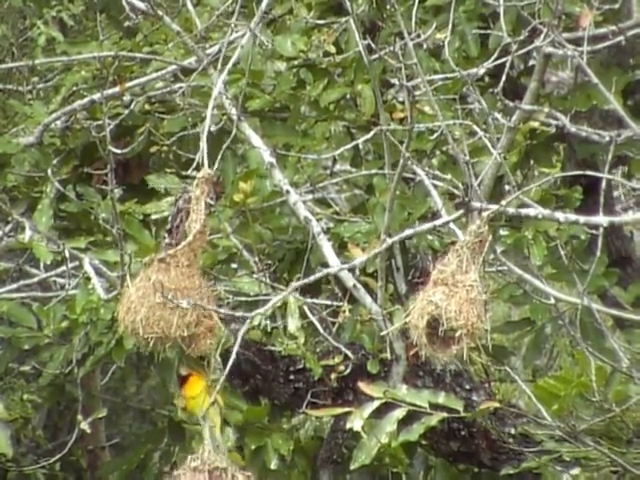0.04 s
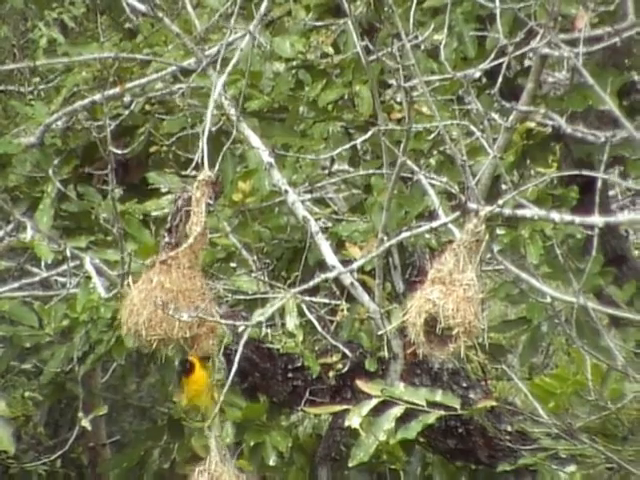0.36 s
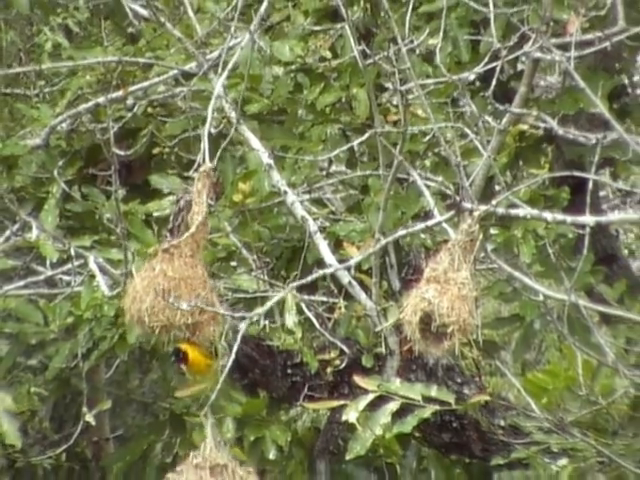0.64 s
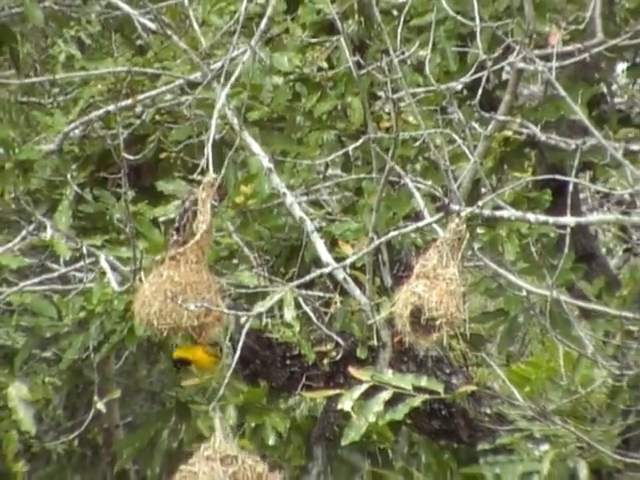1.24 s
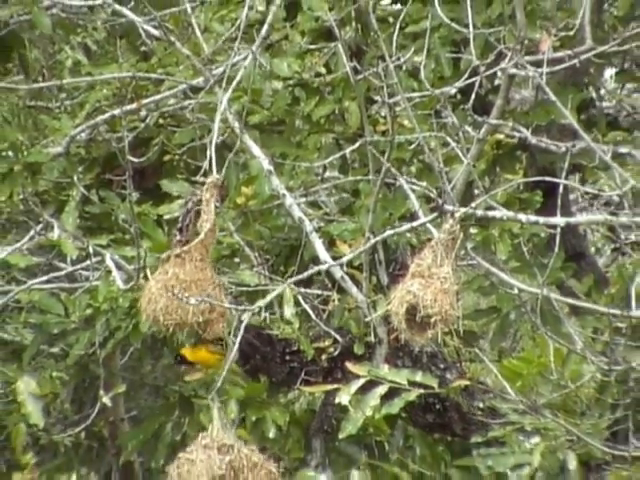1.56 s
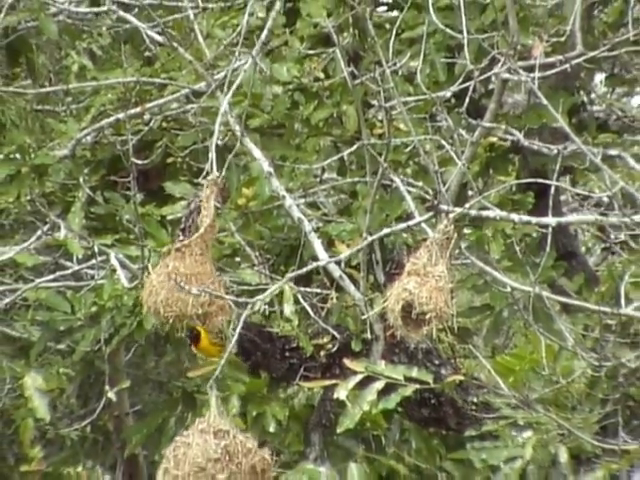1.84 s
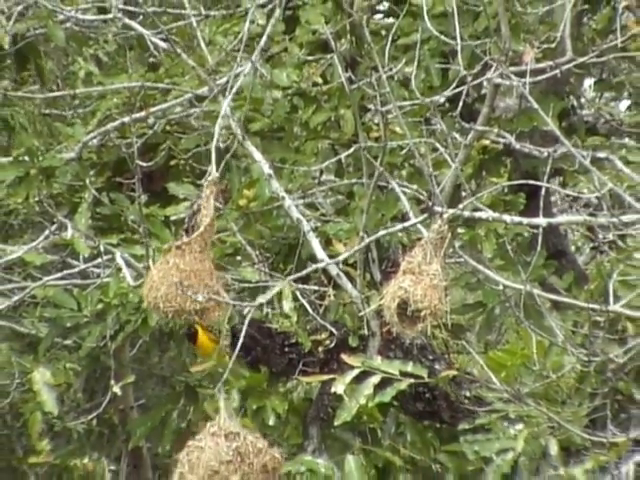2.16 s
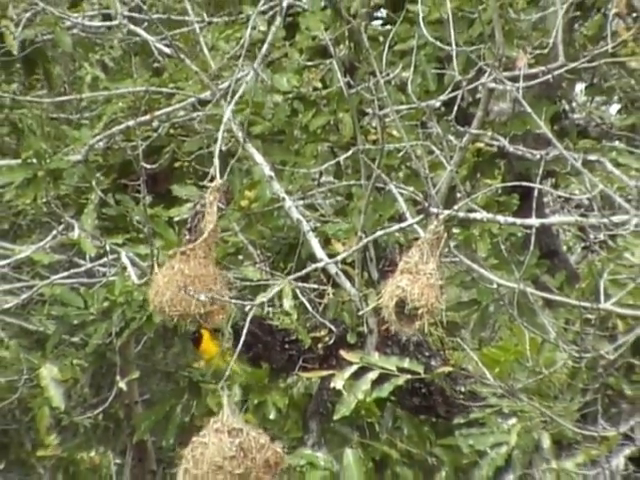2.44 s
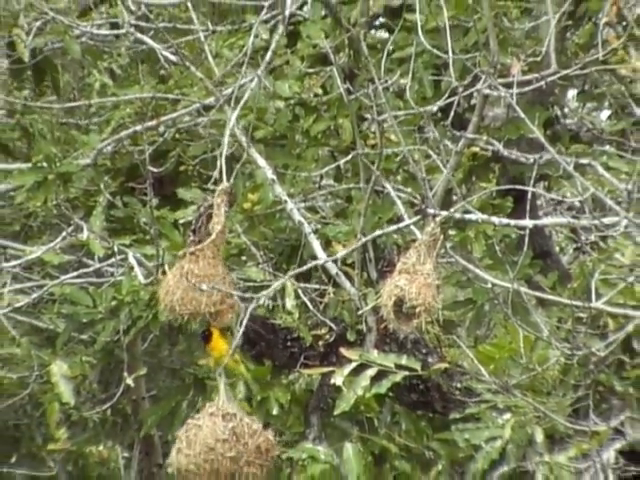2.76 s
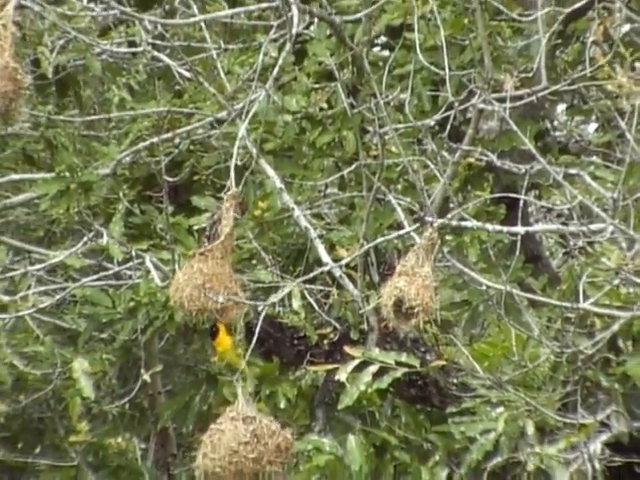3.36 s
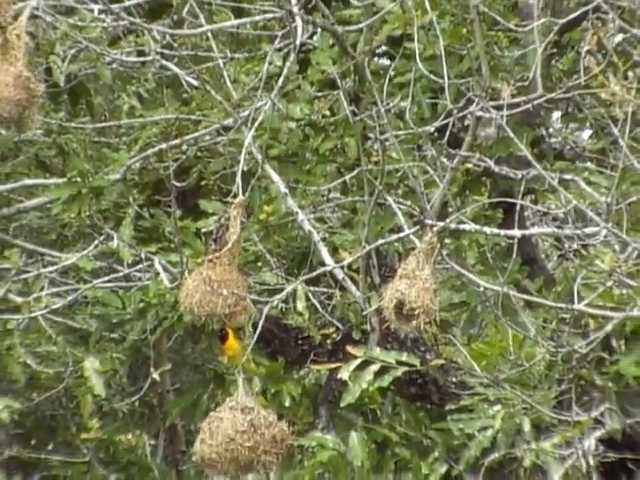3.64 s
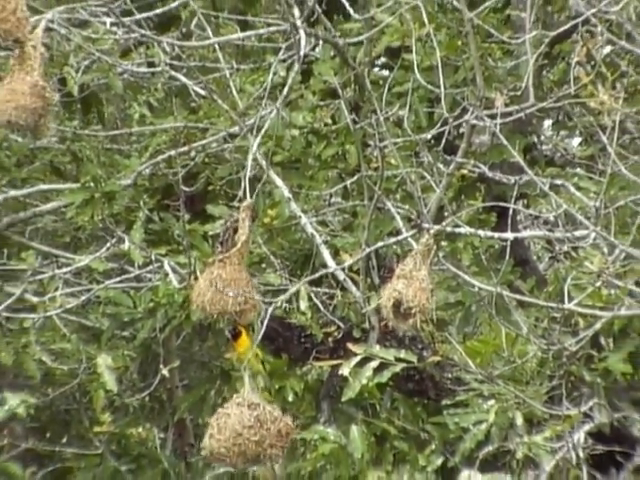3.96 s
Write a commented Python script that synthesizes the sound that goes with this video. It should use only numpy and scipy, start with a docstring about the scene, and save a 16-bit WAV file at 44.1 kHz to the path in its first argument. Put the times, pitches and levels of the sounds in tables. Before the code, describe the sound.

Many small birds chirp and chatter in a tree, close to the microphone. One repeats an arched note while others add rising whistles, sharp chips and rasps. Distant birds babble over a steady hiss.

```python
"""Weaver colony in a tree

Close to a stereo pair of microphones, one bird repeats a rising whistle and another an arched note
every 0.6 s. Neighbours add slurs, chips, nasal calls, rasps, buzzes and croaks, scattered by the branches.
Each whistle is an unsteady tone of the syrinx. Farther off, the colony blends into a babble over a
steady hiss, with a few soft low bumps."""
import sys
import numpy as np
from scipy import signal
from scipy.fft import rfft, irfft
from scipy.io import wavfile

SR = 44100
rng = np.random.default_rng(int(sys.argv[2]) if len(sys.argv) > 2 else 0)


def to_wav(sig):
    """Store sig (one row per channel, or 1-D mono) as 16-bit WAV at the path in sys.argv[1].

    Samples outside -1..1 are clipped; the rate is SR.
    """
    pcm = np.clip(np.atleast_2d(sig), -1, 1) * 32767
    pcm = np.round(pcm).astype(np.int16)
    wavfile.write(sys.argv[1], SR, pcm.T)  # frames by channels


N = 176400
TIME_S = np.arange(N) / SR
LEFT_RIGHT = np.array([[1], [-1]])
TREE_T60_S = 0.28


def from_db(db):
    """Decibels to gain."""
    return 10 ** (np.asarray(db) / 20)


def rms_one(x):
    """Scale to unit rms."""
    return x / np.sqrt(np.mean(x ** 2) + 1e-20)


def at_hz(points, hz):
    """Read a spectrum on a log-frequency axis."""
    freqs, values = np.transpose(points)
    return np.interp(np.log(hz), np.log(freqs), values)


def contour(points, at):
    """Read a curve of straight lines between points."""
    return np.interp(at, *np.transpose(points))


def bandpass(x, low_hz, high_hz):
    """Keep one band, with gentle slopes."""
    return signal.sosfilt(signal.butter(2, [low_hz, high_hz], "band", fs=SR, output="sos"), x)


def drift(rate_hz, size):
    """Smooth random wander of spread about 1."""
    at = np.arange(size) * rate_hz / SR
    knots = np.random.default_rng(rng.integers(1 << 30)).standard_normal(int(at[-1]) + 2)
    return np.interp(at, np.arange(len(knots)), knots)


def progress(length_s):
    """Runs from 0 to 1 over a note; called u below."""
    return np.linspace(0, 1, max(int(length_s * SR), 64))


def envelope(u, edge):
    """Soft rise, hold, soft fall; each edge takes the given share of the note."""
    return np.sin(np.pi / 2 * np.clip(np.minimum(u, 1 - u) / edge, 0, 1))


def pulse_cycle(per_s, jitter, jitter_hz, size):
    """Runs from 0 to 1 over each pulse of an uneven train."""
    return np.cumsum(per_s * (1 + jitter * drift(jitter_hz, size))) / SR % 1


def perch(out, start_s, sound):
    """Mix a sound in at its time, from a perch a little left or right of the microphones."""
    onset = int(start_s * SR)
    first, last = max(onset, 0), min(onset + len(sound), N)
    pan = from_db(-0.25 * rng.normal() * LEFT_RIGHT)
    if last > first:
        out[:, first:last] += pan * sound[first - onset:last - onset]


def whistle(hz, waver=0.007, rough=0):
    """An unsteady tone of the syrinx; fast flutter of its strength makes it hoarse."""
    phase = 2 * np.pi * np.cumsum(hz * (1 + waver * drift(583, len(hz)))) / SR
    hoarse = (1 + rough * drift(1400, len(hz))) / np.sqrt(1 + rough ** 2)
    shimmer = from_db(1.32 * drift(201, len(hz)))
    return (np.sin(phase) + from_db(-22) * np.sin(2 * phase)) * hoarse * shimmer


def scatter(x, t60_s, side_db=-15):
    """Many small reflections from leaves and branches, dying away."""
    t = np.arange(SR // 2) / SR
    mid, side = rng.standard_normal((2, len(t))) * from_db(-60 * t / t60_s) * (t > .001)
    echoes = (mid + from_db(side_db) * side * LEFT_RIGHT) / np.sqrt(np.sum(mid ** 2))
    return signal.fftconvolve(x, echoes, axes=1)[:, :N]


def off_axis(x, left_lead_s):
    """Sound from one side reaches one microphone slightly earlier."""
    hz = np.arange(N // 2 + 1) * SR / N
    return irfft(rfft(x) * np.exp(1j * np.pi * hz * left_lead_s * LEFT_RIGHT), N)


# How alike the ambience is at the two microphones: frequency_hz, correlation
MIC_LIKENESS = [(40, 0.97), (2800, 1), (4500, 0.75), (6500, 0.034), (8000, 0.023), (11000, 0.019)]

def ambience(spectrum, flicker_db, low_flicker_db):
    """Third-octave stereo noise at unit rms, each band with its own level, flicker and width."""
    out, edges = 0, 30 * 2 ** (np.arange(27) / 3)
    white = rng.standard_normal((2, 2, N))
    for k, (low, high) in enumerate(zip(edges, edges[1:])):
        mid, side = bandpass(white[k % 2], low, high)
        hz = np.sqrt(low * high)
        alike = at_hz(MIC_LIKENESS, hz)
        band = np.sqrt(1 + alike) * mid + np.sqrt(1 - alike) * side * LEFT_RIGHT
        depth_db = at_hz([(180, low_flicker_db), (520, flicker_db)], hz)
        out = out + from_db(at_hz(spectrum, hz) + depth_db * drift(22.23, N)) * band
    return rms_one(out)


# Hiss all around the tree: frequency_hz, relative_density_db
HISS_SPECTRUM = [(30, -69), (60, -31.5), (120, -33.5), (250, -11), (500, 0.5), (800, 3.5), (1100, 2.5),
                 (1800, 8.5), (3000, -10), (5000, 0.5), (6400, 3), (7700, 7), (9500, 7.5), (11000, -3)]
# Faint rumble, the same at both microphones: time_s, level_db
RUMBLE_LEVELS = [(0, -76.5), (1.1, -75.5), (1.2, -104), (1.6, -105), (1.7, -75), (2.4, -69), (3.3, -80),
                 (4, -76)]

def background():
    """Steady hiss with an uneven low rumble and a faint wavering hum."""
    phase = 2 * np.pi * np.cumsum(808 + 6.94 * drift(60, N)) / SR
    hum = from_db(-61 + 2 * drift(4.93, N)) * np.sin(phase + .5 * LEFT_RIGHT)
    low_noise = rms_one(bandpass(rng.standard_normal(N), 62.4, 356))
    rumble = low_noise * from_db(contour(RUMBLE_LEVELS, TIME_S) + 3.3 * drift(24.94, N))
    hiss = from_db(-47) * ambience(HISS_SPECTRUM, flicker_db=.5, low_flicker_db=8.5)
    return hiss + hum + rumble


# Echoes of the distant birds: frequency_hz, relative_density_db
WASH_SPECTRUM = [(200, -60), (500, -24.5), (1200, -22), (1900, -7.5), (2400, -13), (2800, 0.5),
                 (3400, -6.5), (3900, -1.5), (4700, -9), (5600, -33), (7000, -15)]
# Distant chatter as it reaches the microphones: time_s, level_db
BABBLE_LEVELS = [(0, -42.5), (.25, -39.5), (0.549, -43), (.68, -39.5), (.87, -42), (1.1, -38), (1.27, -41),
                 (1.36, -46.5), (1.48, -40), (1.63, -48), (1.8, -38), (1.99, -43.5), (2.1, -39),
                 (2.45, -37.5), (2.93, -36), (3.5, -36.5), (3.72, -41), (3.95, -37)]

def far_colony(calls_per_s=190, low_hz=2727, high_hz=3852):
    """Distant birds slur at random in two registers; their echoes merge into a wash."""
    wash = from_db(-3.5) * ambience(WASH_SPECTRUM, flicker_db=2.3, low_flicker_db=2.3)
    calls = np.zeros((2, N))
    chance = np.random.default_rng(rng.integers(1 << 30))
    for _ in range(int(calls_per_s * N / SR)):
        when, register, span = chance.random(3)
        pitch, glide, strength = np.clip(chance.normal(size=3), -2, 2)
        u = progress(.008 + .035 * span ** 2)
        register_hz = low_hz if register < .55 else high_hz
        hz = register_hz * np.exp(.1 * pitch + 0.1809 * (glide - .5) * (u - .5))
        tone = whistle(hz, waver=0.017, rough=.4)
        perch(calls, when * N / SR, from_db(2 * strength) * envelope(u, 0.12) * tone)
    babble = rms_one(calls + from_db(-3.5) * scatter(calls, TREE_T60_S))
    return from_db(contour(BABBLE_LEVELS, TIME_S)) * rms_one(babble + wash)


# Soft low bumps, near the centre: start_s, length_s, level_db
LOW_BUMPS = [(0.069, 0.035, -58.5), (1.84, 0.039, -50), (2.487, 0.029, -52.5), (3.974, 0.016, -48)]

def bumps():
    """Short, soft puffs of low noise."""
    out = np.zeros((2, N))
    low_noise = rms_one(bandpass(rng.standard_normal(N), 233, 680))
    for start, length, db in LOW_BUMPS:
        u = progress(length)
        puff = np.roll(low_noise, int(start * SR))[:len(u)]
        perch(out, start, from_db(db) * envelope(u, 0.057) * puff)
    return out


# Low croaks under the nearby chatter: start_s, length_s, level_db
CROAK_CALLS = [(2.507, 0.16, -52), (2.715, 0.11, -56.5), (3.056, 0.23, -51.5)]

def croaks():
    """Hoarse calls: noise, chopped in uneven pulses, in a low resonance."""
    out = np.zeros((2, N))
    cycle = pulse_cycle(per_s=54, jitter=0.19, jitter_hz=80, size=N)
    pulses = rng.standard_normal(N) * np.exp(-1.5 * cycle)
    voice = rms_one(bandpass(pulses, 660, 980))
    for start, length, db in CROAK_CALLS:
        u = progress(length)
        croak = np.roll(voice, -int(start * SR))[:len(u)]
        perch(out, start, from_db(db) * envelope(u, 0.19) * croak)
    return out


# Bright buzzes from nearby perches: start_s, length_s, low_hz, high_hz, level_db
BUZZ_CALLS = [(0.709, 0.066, 4900, 6850, -49), (0.879, 0.16, 5000, 10400, -53),
              (1.027, 0.036, 4770, 10300, -48.5), (1.092, 0.02, 5000, 10600, -47.5),
              (1.175, 0.071, 4650, 5800, -46), (1.803, 0.11, 4800, 9300, -52),
              (2.939, 0.039, 5000, 9500, -46.5), (3.042, 0.13, 6400, 10400, -48),
              (3.47, 0.038, 7500, 11100, -47), (3.748, 0.065, 5030, 8200, -47.5),
              (3.964, 0.022, 7000, 9200, -49.5)]

def buzzes(pulse_decay_db=7):
    """Short surges of bright sizzle, chopped into quick uneven pulses."""
    out = np.zeros((2, N))
    for start, length, low, high, db in BUZZ_CALLS:
        u = progress(length)
        cycle = pulse_cycle(per_s=130, jitter=0.42, jitter_hz=180, size=len(u))
        pulses = drift(SR, len(u)) * from_db(-pulse_decay_db * cycle)
        perch(out, start, from_db(db) * envelope(u, 0.13) * rms_one(bandpass(pulses, low, high)))
    return out


# Nasal scolding close by: start_s, length_s, start_hz, end_hz, level_db
NASAL_CALLS = [(2.643, 0.15, 1020, 826, -40), (3.026, .19, 1150, 809, -42)]
# Its harmonics, first to fourth: relative_db
NASAL_HARMONICS = [-27, -5, -24, 0]

def nasal_calls():
    """Falling calls whose strong second and fourth harmonics make them nasal."""
    out = np.zeros((2, N))
    for start, length, first, last, db in NASAL_CALLS:
        u = progress(length)
        hz = (first + (last - first) * u ** .8) * (1 + 0.021 * drift(910, len(u)))
        phase = 2 * np.pi * np.cumsum(hz) / SR
        voice = sum(from_db(level + 4 * drift(143, len(u))) * np.sin(k * phase)
                    for k, level in enumerate(NASAL_HARMONICS, 1))
        perch(out, start, from_db(db) * envelope(u, 0.037) * voice)
    return out


# Rasping scolds close by: start_s, length_s, centre_hz, level_db
RASP_CALLS = [(0.125, 0.17, 4020, -46), (0.712, 0.11, 4500, -45), (0.906, 0.084, 4320, -46.5),
              (1.012, 0.09, 4040, -39), (1.173, 0.17, 4080, -50), (1.418, 0.22, 4060, -47),
              (1.827, 0.17, 3797, -41), (2.076, 0.062, 4066, -39.5), (2.52, 0.094, 3220, -44),
              (2.652, 0.13, 3920, -39.5), (2.879, 0.16, 3690, -38.5), (3.001, 0.23, 3850, -41),
              (3.069, .055, 3870, -38.5), (3.352, 0.14, 4006, -38.5), (3.465, 0.077, 4135, -40)]

def rasps(swing=0.215):
    """The pitch is thrown down again and again in uneven pulses."""
    out = np.zeros((2, N))
    for start, length, hz, db in RASP_CALLS:
        u = progress(length)
        cycle = pulse_cycle(per_s=150, jitter=0.26, jitter_hz=200, size=len(u))
        tone = whistle(hz * (1 + swing * (1 - 2 * cycle) + 0.1044 * drift(1500, len(u))))
        pulses = tone * envelope(cycle, 0.033) * from_db(-1.5 * drift(234, len(u)))
        perch(out, start, from_db(db) * envelope(u, 0.36) * rms_one(pulses))
    return out


# Slurs from the near branches: start_s, length_s, start_hz, end_hz, level_db
SLUR_NOTES = [(0.249, 0.054, 2350, 2060, -42), (0.304, 0.026, 4480, 3930, -28.5),
              (0.448, 0.052, 4260, 3820, -39), (0.484, 0.018, 3460, 3325, -29),
              (0.627, 0.026, 3850, 4180, -43), (0.725, 0.057, 2630, 2180, -27),
              (0.894, 0.062, 2680, 2115, -27.5), (0.916, 0.028, 4750, 4720, -44),
              (0.952, 0.036, 2784, 2715, -35.5), (0.974, 0.019, 3800, 3860, -39),
              (1.01, 0.019, 2700, 2630, -32.5), (1.091, 0.0365, 2730, 2166, -29),
              (1.632, 0.037, 3920, 3650, -37), (1.773, 0.054, 2920, 2710, -39),
              (1.92, 0.043, 3890, 3650, -35.5), (2.015, 0.03, 4010, 3756, -35.5),
              (2.138, 0.027, 4050, 4530, -35), (2.175, 0.049, 2885, 2680, -37),
              (2.358, 0.033, 3850, 4520, -33), (2.494, 0.04, 2818, 2146, -28.5),
              (2.537, 0.0234, 3956, 3670, -29), (2.612, 0.048, 2720, 2113, -31.5),
              (2.652, 0.082, 4795, 4365, -37.5), (2.685, 0.079, 3880, 3670, -30.5),
              (2.749, 0.034, 3680, 3420, -37), (2.843, 0.018, 3840, 3730, -31),
              (3.078, 0.027, 4170, 3930, -32.5), (3.206, .035, 3270, 2500, -56),
              (3.269, 0.027, 3850, 3380, -35), (3.542, 0.025, 2730, 2010, -39.5),
              (3.892, 0.019, 3160, 3750, -32.5)]
# Level whistles from deep in the tree: start_s, length_s, pitch_hz, level_db
HELD_NOTES = [(.175, .085, 2760, -39), (.8, .085, 2700, -41), (1.4, .14, 2860, -44)]
# Sharp, falling chips close by: start_s, length_s, start_hz, level_db
CHIP_NOTES = [(0.089, 0.025, 3900, -39), (0.402, 0.018, 4600, -40), (0.671, 0.013, 5400, -37.5),
              (0.768, 0.022, 4900, -37), (0.784, 0.012, 3660, -37), (.81, 0.015, 4850, -40),
              (.972, 0.014, 4850, -34), (0.989, 0.012, 4860, -34), (1.065, 0.018, 4750, -41),
              (1.115, 0.013, 4800, -33), (1.218, 0.028, 5120, -40), (1.562, 0.017, 4200, -39),
              (1.751, 0.0203, 4370, -38), (1.807, .018, 5000, -40), (1.909, 0.023, 4920, -35),
              (2.081, 0.014, 4370, -37.5), (2.553, .018, 2960, -33), (3.503, 0.02, 4720, -30.5)]
# Near notes that swell, then hook down in pitch: start_s, length_s, pitch_hz, reference_db
HOOK_NOTES = [(3.136, 0.042, 4670, -23.5), (3.553, .051, 4275, -22)]
# Thin, sizzling high calls close by: start_s, length_s, start_hz, end_hz, level_db
THIN_NOTES = [(0.887, 0.16, 10540, 8040, -49), (1.244, 0.092, 8770, 7530, -49.5),
              (1.526, 0.1, 9300, 7300, -48), (1.938, 0.08, 9250, 7280, -49),
              (2.48, 0.06, 9350, 6920, -44.5), (3.087, .08, 9600, 9160, -51),
              (3.276, 0.086, 8500, 7400, -47), (3.645, 0.029, 6050, 5400, -44)]

def whistlers(slur_fade_db=13, chip_fall=.27, hook_drop=.25, hook_swell_db=8.5):
    """Birds around the tree bend the tone of the syrinx into five kinds of short note."""
    out = np.zeros((2, N))
    for start, length, first, last, db in SLUR_NOTES:
        u = progress(length)
        tone = whistle(first + (last - first) * u ** 0.724, rough=.25)
        perch(out, start, from_db(db - slur_fade_db * (2 * u - 1) ** 2) * envelope(u, 0.12) * tone)
    for start, length, hz, db in HELD_NOTES:
        u = progress(length)
        tone = whistle(np.full(len(u), hz), waver=.014, rough=.35)
        perch(out, start, from_db(db) * envelope(u, 0.17) * tone)
    for start, length, hz, db in CHIP_NOTES:
        u = progress(length)
        perch(out, start, from_db(db) * envelope(u, 0.14) * whistle(hz * (1 - chip_fall * u)))
    for start, length, hz, db in HOOK_NOTES:
        u = progress(length)
        tone = whistle(hz * (1 - hook_drop * u ** 6.88), rough=.2)
        perch(out, start, from_db(db - hook_swell_db * (1.5 - u)) * envelope(u, 0.037) * tone)
    for start, length, first, last, db in THIN_NOTES:
        u = progress(length)
        hz = (first + (last - first) * u) * (1 + .045 * drift(3000, len(u)))
        gain = from_db(db + 2.5 * drift(130, len(u)))
        perch(out, start, gain * envelope(u, 0.15) * whistle(hz, waver=0.022, rough=.5))
    return out


# Rising whistles, near and just right of centre: start_s, length_s, start_hz, end_hz, level_db
RISING_NOTES = [(-.02, 0.15, 3840, 7270, -35), (0.319, 0.14, 3920, 7150, -35.5),
                (2.432, 0.12, 4350, 7250, -45.5), (3.866, 0.13, 4630, 7050, -42)]
# Arched notes, near and just left of centre: start_s, length_s, level_db
ARCHED_NOTES = [(0.428, .11, -34), (1.032, 0.12, -34.5), (1.633, 0.11, -33.5), (2.24, 0.11, -41),
                (2.837, .125, -33.5), (3.458, 0.11, -33)]
# The shape of every arch: share_of_note, pitch_hz
ARCH_PITCH = [(0, 1950), (.14, 2480), (.28, 2875), (.42, 3020), (.6, 2980), (.8, 2680), (1, 1960)]

def singers(rise_fade_db=6.4, arch_dip_db=4.5):
    """One bird repeats a rising whistle, another an arched note, both from behind leaves."""
    rising, arched = np.zeros((2, 2, N))
    for start, length, first, last, db in RISING_NOTES:
        u = progress(length)
        tone = whistle(first + (last - first) * u ** 1.5, waver=.017, rough=.35)
        perch(rising, start, from_db(db - rise_fade_db * u ** 2) * envelope(u, 0.28) * tone)
    for start, length, db in ARCHED_NOTES:
        u = progress(length)
        tone = whistle(contour(ARCH_PITCH, u), rough=.3)
        gain = from_db(db - arch_dip_db * np.sin(np.pi * u) ** 2)  # softer at the top of the arch
        perch(arched, start, gain * envelope(u, 0.12) * tone)
    direct = off_axis(rising, left_lead_s=-23e-6) + off_axis(arched, left_lead_s=18e-6)
    leaves = from_db(-9.5) * scatter(direct, t60_s=0.027)
    return direct + leaves


def scene():
    """At the microphones: near birds with their echoes in the tree, the far colony and the background."""
    chatter = whistlers() + nasal_calls() + rasps() + buzzes() + croaks()
    songs = singers()
    twigs = from_db(-4.5) * scatter(chatter, t60_s=0.069, side_db=-13.5)
    tree = from_db(-9.5) * scatter(chatter + songs, TREE_T60_S)
    return chatter + songs + twigs + tree + bumps() + background() + far_colony()


def record(dry):
    """Both microphone channels are cut steeply above 11.1 kHz."""
    return signal.sosfilt(signal.ellip(14, .2, 80, 11100, fs=SR, output="sos"), dry)


dry = scene()
out = record(dry)
to_wav(out)
```